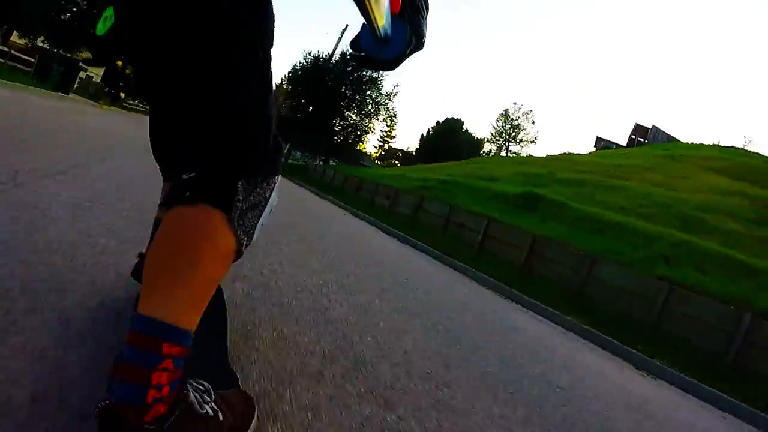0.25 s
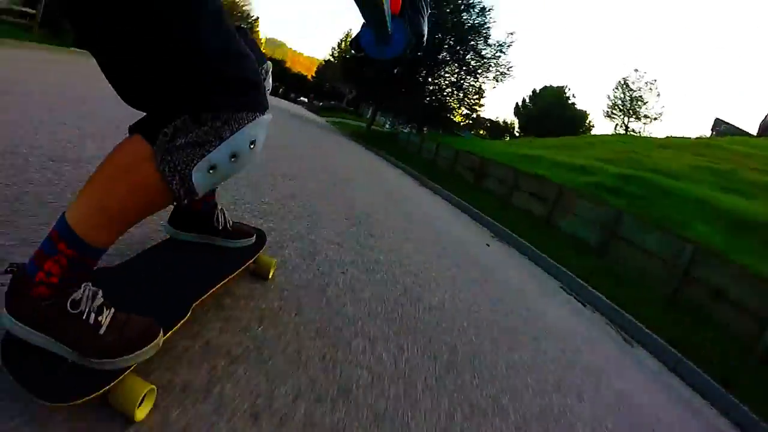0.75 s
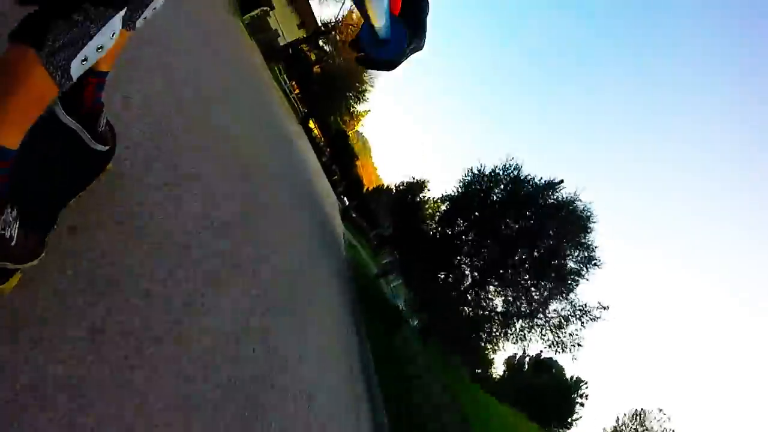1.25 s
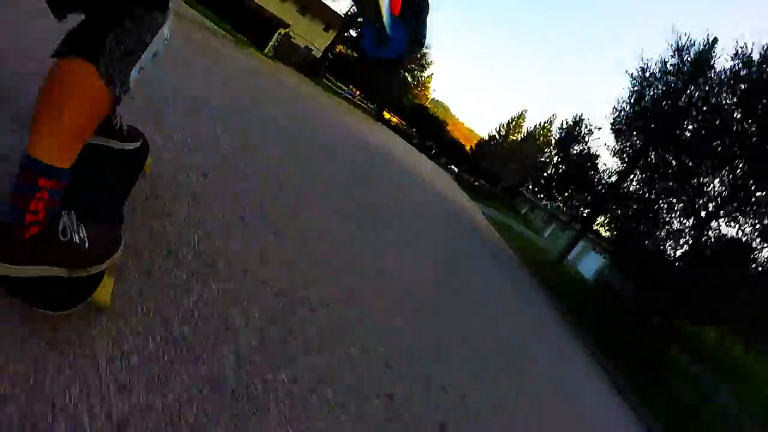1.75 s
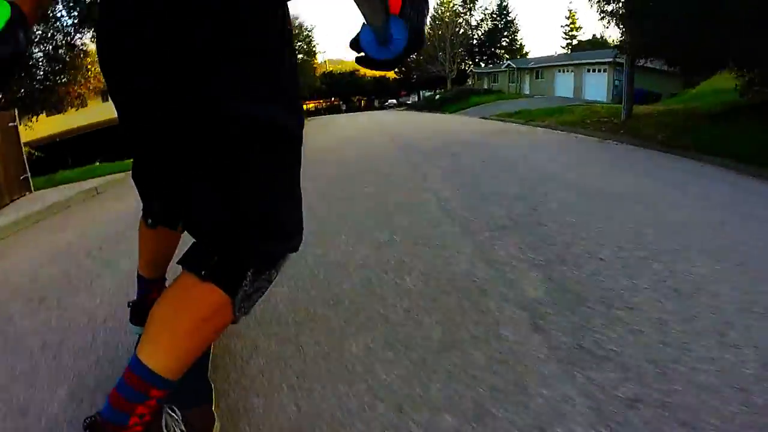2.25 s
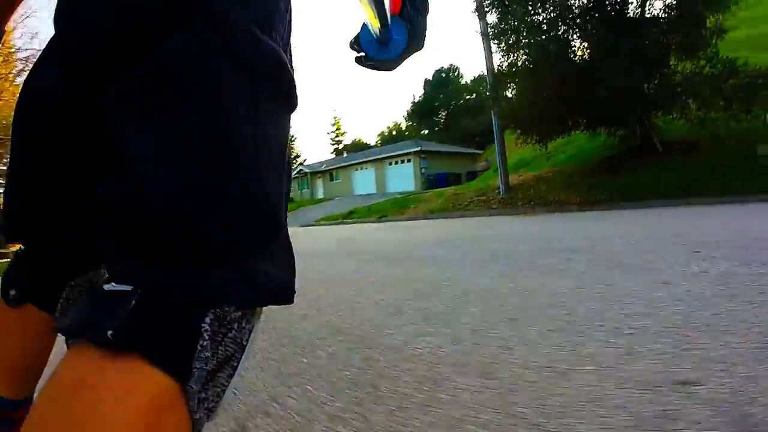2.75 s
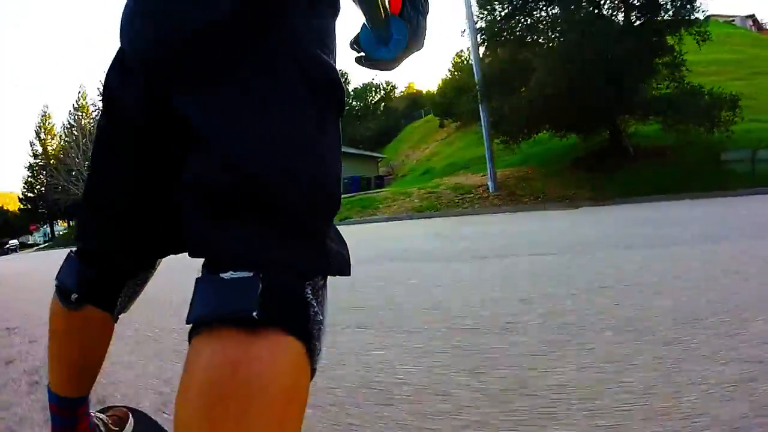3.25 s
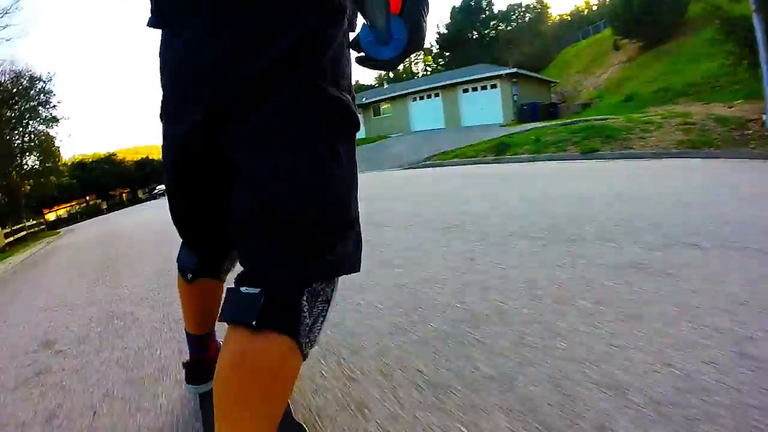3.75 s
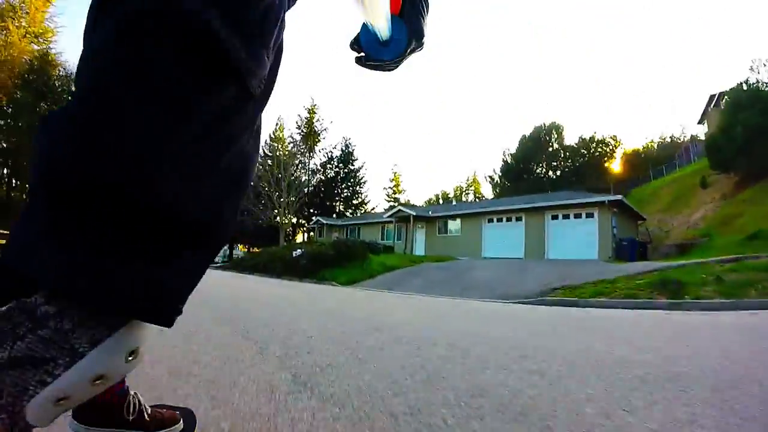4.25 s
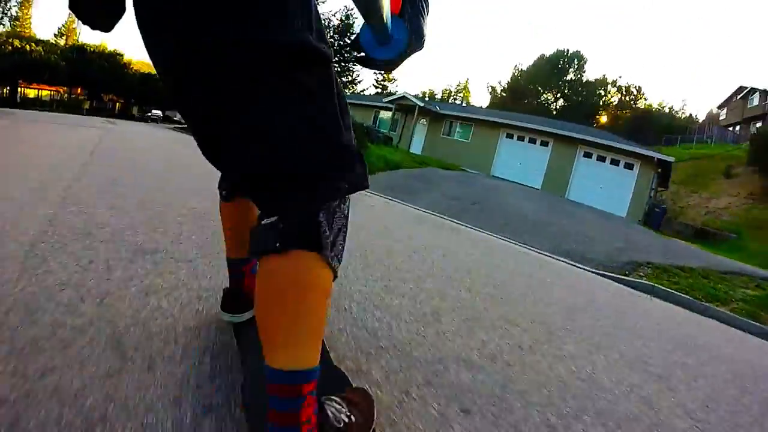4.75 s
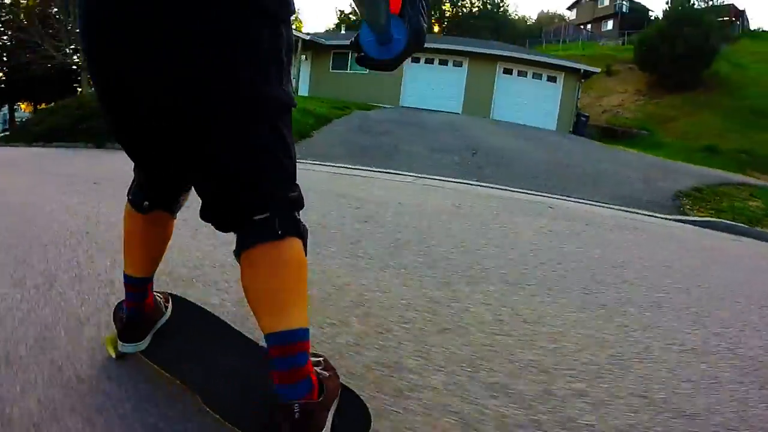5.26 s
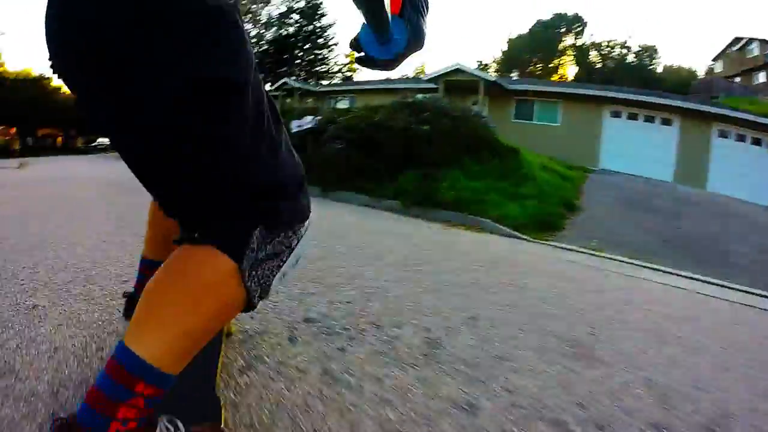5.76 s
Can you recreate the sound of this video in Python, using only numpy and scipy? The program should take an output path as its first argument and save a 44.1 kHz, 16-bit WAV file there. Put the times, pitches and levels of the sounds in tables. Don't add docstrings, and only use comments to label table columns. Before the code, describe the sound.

Heavy wind buffets a pole-mounted microphone while longboard wheels rumble and hiss over rough asphalt, with sliding scrubs and small pebble clicks.

```python
import sys
import numpy as np
from scipy import signal
from scipy.fft import rfft, irfft
from scipy.io import wavfile
from scipy.ndimage import uniform_filter1d, minimum_filter1d

SR = 44100
rng = np.random.default_rng(int(sys.argv[2]) if len(sys.argv) > 2 else 0)


def master_out(mix):
    frames = np.transpose(np.atleast_2d(mix))
    ceiling = np.clip(frames, -1, 1)
    pcm = np.round(ceiling * 32767).astype(np.int16)
    wavfile.write(sys.argv[1], SR, pcm)


def amplitude_ratio(level_db):
    exponent = np.asarray(level_db, float) / 20
    return 10 ** exponent


N = 265482

# time in seconds, level in dB.
WIND_PRESSURE = [(0, -16.5), (0.25, -22.5), (0.4, -21.5), (0.85, -17.5), (1.2, -21), (1.5, -21),
                 (1.69, -26.5), (1.85, -27), (2.36, -29), (2.45, -20.5), (3.35, -18), (3.58, -30),
                 (4.1, -22.5), (4.38, -16.5), (4.8, -25.5), (5.4, -22.5), (5.82, -28.5), (6.02, -14.5)]
# frequency in Hz, density in dB per Hz.
HEAVE_SPECTRUM = [(10, -24.5), (22, -4), (35, -5), (60, -4), (90, -10.5), (140, -12), (300, -33.5)]
FLUTTER_SPECTRUM = [(50, -11.5), (90, -2.5), (130, -6.5), (200, -4.5), (260, -8.5), (350, -10),
                    (700, -52.5)]
# peak time in seconds, peak in dB, width in ms.
SUCKS = [(0.002, 2.5, 0.87), (0.129, -12, 11), (0.157, -12, 7.6), (0.203, -9.5, 2.4), (0.252, -21.5, 5.1),
         (0.552, -12.5, 9.1), (0.652, -19, 15.5), (0.681, -15.5, 9.1), (0.745, -14, 5), (0.756, -7.5, 7.1),
         (0.792, -10, 12), (0.845, -14, 5.1), (0.871, -8.5, 2.1), (0.986, -11, 2.9), (1.118, -7, 2.6),
         (1.129, -14.5, 15), (1.169, -17, 9.8), (2.015, -11, 7.2), (2.454, -3, 12), (2.486, -9, 8.4),
         (2.522, -8, 6.2), (2.579, -7, 2.5), (2.591, -11.5, 8.5), (2.625, -12, 6.4), (2.678, -25, 4.6),
         (2.778, -13.5, 12), (2.807, -8, 3.4), (2.832, -8.5, 11), (2.939, -21, 4.8), (2.956, -11, 4.1),
         (3.03, -6.5, 4.1), (3.047, -9.5, 12), (3.082, -11.5, 11), (3.12, -14, 11), (3.154, -9.5, 9.1),
         (3.187, -16.5, 6.7), (3.266, -15, 13), (3.302, -19, 8.8), (3.375, -7.5, 8.5), (4.186, -18.5, 3.7),
         (4.248, -15, 5.6), (4.312, -8, 14), (4.377, -14.5, 5.7), (4.402, -9.5, 8.6), (4.5, -17, 3.5),
         (5.159, -11.5, 9.2), (5.214, -8, 3.8), (5.272, -1.5, 3.3), (5.336, -16.5, 5.1), (5.388, -8, 7.1),
         (5.408, -12, 6.4), (5.417, -11.5, 5.4), (5.925, -9, 5.1), (5.983, -9, 4.6), (6, -12, 4.2)]
PUSHES = [(0.07, -19, 5.6), (0.139, -24, 5.9), (0.559, -6.5, 3.9), (0.666, -17, 8.1), (0.737, -11, 5.5),
          (0.772, -15, 5.8), (0.816, -14, 4.0), (0.882, -27, 8.6), (0.901, -7, 4.4), (1.114, -6, 5.6),
          (1.159, -11, 8), (2.44, -1, 7.5), (2.462, -3.5, 5.9), (2.575, -4.5, 5.5), (2.606, -6.5, 11),
          (2.796, -21, 20.7), (2.822, -10, 7), (2.923, -14, 5.8), (2.966, -10, 13), (3.013, -13, 7.6),
          (3.034, -16, 4.7), (3.051, -13, 3.3), (3.067, -10, 5.1), (3.073, -17, 2.3), (3.105, -6.5, 2.9),
          (3.132, -10, 5.6), (3.162, -16, 7), (3.37, -11, 6.5), (3.393, -11, 5.1), (4.133, -1.5, 1.4),
          (4.276, -12, 13), (4.299, -15, 7.4), (4.322, -8, 7.6), (4.349, -12, 2.9), (4.387, -17, 9.8),
          (4.393, -8, 2), (4.428, -12, 11), (4.507, -14, 6.3), (5.268, -6, 13), (5.303, -9, 12),
          (5.342, -5.5, 2.8), (5.379, -18, 3.4), (5.397, -13, 12), (5.431, -11, 10), (5.656, -6.5, 4.5),
          (5.959, -7, 11), (5.995, -8, 15), (6.019, -6, 7.1)]
# time in seconds, peak in dB, centre
# in Hz, width in ms.
SNAPS = [
    (3.2228, -41, 11500, .1),
    (4.7255, -35, 2100, 1.6),
    (4.7675, -36, 3200, 1.5),
    (3.338, -41, 3400, 1.5),
    (3.377, -48, 5600, 1.2),
    (1.298, -33, 2400, 1.6),
    (2.094, -43, 4600, 1.5),
]
# time in seconds, peak at 4-8 kHz in dB, 8-14 kHz over it in dB, 2.5-4 kHz over it in dB.
PEBBLES = [(0.103, -48, -37, 6), (0.1505, -34.5, -26, 2), (0.8908, -44, -16, -3), (1.5918, -26, -31, -14),
           (1.8874, -57, -11.5, -3), (2.054, -40.5, -36, -2), (2.0605, -30.5, -24.5, 7),
           (2.397, -39, -28.5, -17), (3.4123, -52.5, -12.5, -11), (3.6631, -49, -13, -7),
           (3.5852, -42, -10.5, -17), (3.755, -43.5, -27, -9), (3.869, -48, -12.5, -2),
           (3.9892, -47.5, -12, -7), (4.1756, -39.5, -16.5, 0), (4.487, -33.5, -17, 7.5),
           (4.579, -31.5, -19, -4), (4.6718, -34, -27, -4), (4.6985, -35.5, -28, -4),
           (4.7505, -42, -26, -19), (4.7646, -31.5, -28.5, -6), (4.781, -33.5, -34, 5),
           (4.819, -45, -8, -6), (5.1192, -48, 1, 5), (5.2563, -41, -25, 19), (5.357, -53, -6, 0),
           (5.802, -38.5, -30, 14)]
# frequency in Hz, density in dB per Hz.
PEBBLE_BANDS = [
    [(4000, -13), (4800, -3.5), (5300, 1.5), (6200, -10), (7500, -14.5), (8500, -31)],
    [(7500, -21), (8500, 0.5), (11000, -2), (13200, -7.5), (14200, -23)],
    [(2200, -30), (2900, -7.5), (3350, -4.5), (3700, -3.5), (4100, -26.5)],
]
# peak
# time in seconds, peak in dB, ring in Hz.
CRACKS = [(0.039, -11, 365), (0.151, -16, 240), (0.22, -5.5, 379), (0.793, -15.5, 229), (0.798, -21, 320),
          (0.891, -10, 344), (0.949, -12, 254), (0.965, -17, 380), (1.094, -14, 227), (1.094, -5, 410),
          (1.15, -8, 390), (1.197, -5, 393), (1.392, -12, 358), (1.477, -13, 338), (1.603, -13, 410),
          (2.094, -17, 241), (2.302, -18, 360), (2.442, -13, 336), (2.574, -11, 237), (2.803, -15, 228),
          (2.826, -18, 226), (2.888, -14, 325), (2.956, -10.5, 369), (3.027, -8.5, 364), (3.244, -16, 400),
          (3.258, -17, 215), (3.277, -9, 356), (3.335, -3, 374), (3.603, -11.5, 346), (3.784, -11, 353),
          (4.517, -15, 216), (4.604, -19, 397), (4.637, -13, 251), (4.638, -6, 376), (4.66, -5, 394),
          (4.688, -16, 260), (4.694, -9, 339), (4.736, -15, 349), (4.775, -17, 243), (4.82, -7, 401),
          (4.856, -13, 245), (4.975, -5.5, 369), (5.117, -7.5, 349), (5.178, -6.5, 349), (5.217, -11, 196),
          (5.481, -15, 386), (5.737, -11.5, 368), (5.903, -8, 330), (5.919, -12, 230), (5.924, -16, 345),
          (5.985, -8, 323), (6.004, -18, 356),
          (0.031, -21, 517), (0.114, -10.5, 583), (0.419, -13, 568), (0.487, -23, 562), (0.561, -21, 573),
          (0.592, -19.5, 926), (0.886, -16, 510), (0.99, -16.5, 880), (0.993, -13, 538), (1.012, -8, 728),
          (1.025, -10, 513), (1.048, -11, 553), (1.081, -10.5, 695), (1.107, -9, 528), (1.116, -15, 840),
          (1.203, -14, 820), (1.31, -27, 824), (1.352, -9, 566), (1.441, -9, 517), (1.502, -10.5, 914),
          (1.661, -18, 832), (1.664, -15, 590), (2.009, -15, 553), (2.29, -14, 555), (2.33, -15.5, 586),
          (2.475, -18.5, 830), (2.542, -14.5, 560), (2.864, -14, 768), (2.992, -14, 595), (3.015, -13, 597),
          (3.019, -15, 890), (3.331, -13.5, 568), (4.073, -12, 865), (4.096, -16, 590), (4.244, -12, 590),
          (4.29, -15, 580), (4.353, -15, 596), (4.395, -16, 612), (4.552, -13, 526), (4.611, -4, 547),
          (4.75, -24, 830), (4.779, -19, 918), (4.928, -12.5, 556), (5.253, -10.5, 571), (5.453, -16, 620),
          (5.512, -13, 554), (5.633, -21, 843), (5.639, -10.5, 618), (5.688, -18, 930), (5.715, -12, 559),
          (5.782, -12, 560), (6.018, -27, 840)]
# time in seconds, load in dB, lift of the lowest modes by the rider's weight in dB,
# lift of the middle modes as the front foot eases off in dB.
ROLLING = [(0.0, -26.5, 5.5, 3), (0.08, -22, 3, -7.5), (0.59, -23, -2, -1), (0.74, -29, 6, 4.5),
           (0.93, -18.5, 1.5, -2.5), (1.52, -19.5, -1, -6), (1.86, -28.5, 0.5, -5.5), (2.38, -20, -1, -5.5),
           (2.63, -25.5, 1, -4), (2.9, -21, 1, -3), (3.17, -26.5, 4.5, 3), (3.84, -25.5, 2.5, -3),
           (3.92, -23, -2.5, -3.5), (4.71, -24, 7, 2.5), (4.76, -18.5, 0.5, -4.5), (5.01, -26, 5, 1),
           (5.85, -23, 3, -5.5), (6.02, -20, 2, -5)]
# frequency in Hz, width in Hz, level in dB.
DECK_LOW = [(330, 108.6, 0.5), (379.4, 87.3, 2), (422, 69.7, 0.5), (444.3, 28, -17), (268, 87, -6)]
DECK_MIDDLE = [(477, 63, -3), (540.7, 66, 4), (610.5, 95, 4.5)]
DECK_UPPER = [(672.4, 108, 0), (887.5, 186, 2), (1080, 182, -0.5), (1251, 150, -14.5)]
# time in seconds, hiss from side force in dB, lower and upper tread resonance in Hz,
# rattle of the lower shell modes in dB, lift of the top by dry grit in dB, shell-to-tread gap in Hz.
TYRE_HISS = [(0.0, -41, 5100, 5900, -3, -2.5, 4400), (0.2, -40.5, 5100, 6080, 4, 1.5, 4350),
             (0.42, -43, 5100, 5950, 2.5, 2, 4300), (0.72, -42, 5320, 6080, 1.5, -4.5, 4300),
             (1.0, -41, 5700, 5940, 8, 1.5, 4400), (1.25, -39, 5080, 6980, 5, 2.5, 4600),
             (1.73, -38.5, 5250, 6320, 0.5, -0.5, 4500), (1.8, -53, 5180, 6320, 0, 3, 4400),
             (2.03, -47, 5220, 5900, 3, 1, 4300), (2.41, -39, 5250, 5980, -1.5, 0, 4450),
             (2.68, -49.5, 4700, 6250, -0.5, -0.5, 4100), (2.81, -44.5, 4580, 6230, -0.5, 0, 4000),
             (3.42, -46, 4970, 5900, -4, -1, 4550), (3.84, -45, 5080, 6320, 0, 2, 4350),
             (4.29, -37.5, 4820, 5650, -8, -2.5, 4300), (4.95, -40, 5230, 5850, 3, 1, 4600),
             (5.84, -44, 4970, 6140, -1, 1.5, 4500), (5.97, -40.5, 5400, 6110, 2, 1, 4500)]
# start, return of grip and release length in seconds, extra scrub in dB,
# outer over inner tread in dB.
SLIDES = [
    (0.056, 0.207, .1, 4, 3),
    (0.475, 0.63, 0.086, 7, -7.5),
    (0.73, 1.74, 0.11, 11, -2.5),
    (2.15, 2.486, 0.12, 4.5, -2),
    (2.5, 3.043, 0.069, 7, -4),
    (3.214, 3.44, 0.14, 8.5, -1),
    (3.946, 4.341, 0.15, 4.5, -0.5),
    (4.708, 5.153, 0.17, 2.5, 10),
    (5.502, 5.749, 0.076, 4.5, -5),
]
# frequency in Hz, density in dB per Hz.
SHELL_SPECTRUM = [(790, -29.5), (1350, 0.5), (1460, -6), (1570, -7), (1750, -15), (2010, -6.5),
                  (2180, -13.5), (2470, -14.5), (3340, -5.5), (3500, -9.5), (3870, -19), (4700, -21),
                  (6500, -33.5), (8300, -60)]
TREAD_SPECTRUM = [(3800, -21), (4400, -0.5), (7400, 6), (7900, 6.5), (10000, -46.5)]
SCRUB_SPECTRUM = [(7300, -20.5), (8100, 4.5), (9200, -7), (10300, -3), (11500, -8.5), (12500, -8.5),
                  (13200, -10.5), (14000, -29), (15000, -61)]
FIZZ_SPECTRUM = [(7300, -29), (8100, 1.5), (9000, 5), (9800, -1), (10800, -6), (12500, -14), (13200, -17.5),
                 (13900, -37), (15000, -60.5)]
CHATTER_SPECTRUM = [(1200, -18.5), (1500, -4), (2500, -1.5), (4300, -8), (4700, -16), (5200, -30.5)]
# frequency in Hz, width in Hz, level in dB.
SHELL_NOTCHES = [(8160, 430, -4.5)]


def evened(x):
    return x / np.sqrt(np.mean(x ** 2) + 1e-20)


def columns(rows):
    time_s, *values = np.transpose(rows)
    return [np.interp(np.arange(N) / SR, time_s, v) for v in values]


def coloured(x, points):
    point_hz, point_db = np.transpose(points)
    hz = np.fft.rfftfreq(len(x), 1 / SR)
    gain_db = np.interp(np.log(hz + 1), np.log(point_hz + 1), point_db, left=-90, right=-90)
    return evened(irfft(rfft(x) * amplitude_ratio(gain_db), len(x)))


def resonate(x, hz, width_hz):
    turn = np.exp(2j * np.pi * np.cumsum(hz * np.ones(len(x))) / SR)
    r = np.exp(-np.pi * width_hz / SR)
    return 2 * (turn * signal.lfilter([1 - r], [1, -r], x / turn)).real


def mode(x, hz, width_hz):
    r = np.exp(-np.pi * width_hz / SR)
    section = [1, 0, -1, 1, -2 * r * np.cos(2 * np.pi * hz / SR), r * r]
    return evened(signal.sosfilt([section, section], x))


def flicker(depth_db, slow_hz, fast_hz):
    wander = coloured(rng.standard_normal(N), [(slow_hz, 0), (fast_hz, -6), (2 * fast_hz, -30)])
    return evened(amplitude_ratio(depth_db * wander))


def patchy(x, depth_db):
    z = signal.stft(x, nperseg=256)[2]
    field = uniform_filter1d(rng.standard_normal(z.shape), size=4, axis=0)
    field = uniform_filter1d(field, size=30, axis=1)
    return evened(signal.istft(z * amplitude_ratio(depth_db * evened(field)), nperseg=256)[1][:N])


def grit(per_s, spread_db, smooth):
    size = amplitude_ratio(spread_db * np.minimum(rng.exponential(1, N), 3.3)) * rng.choice([-1., 1.], N)
    knocks = size * (rng.random(N) < per_s / SR)
    return evened(evened(knocks) + smooth * rng.standard_normal(N))


def eddies():
    level_db, rebound, rebound_widths = -0.5, 0.66, 1.9
    out = np.zeros(N + SR)
    for sign, rows in ((-1.0, SUCKS), (0.96, PUSHES)):
        for s, db, width_ms in rows:
            u = np.arange(-3000, 3000) / SR / (width_ms / 2350)
            swing = np.exp(-u ** 2 / 2)
            swing -= rebound / rebound_widths * np.exp(-(u / rebound_widths) ** 2 / 2)
            out[round(s * SR):][:6000] += sign * amplitude_ratio(db + level_db) * swing / swing.max()
    return out[3000:][:N]


def wind():
    heave_db, flutter_db, flutter_follows = -2, -25.5, 0.55
    wake_db, wake_s = -32.5, 0.033
    pressure_db, = columns(WIND_PRESSURE)
    starts = np.zeros(N)
    starts[[round(s * SR) for s, _, _ in SUCKS]] = [amplitude_ratio(db + wake_db) for _, db, _ in SUCKS]
    age = np.arange(SR // 2) / SR / wake_s
    wake = abs(signal.oaconvolve(starts, np.e * age * np.exp(-age))[:N])
    pressure = amplitude_ratio(pressure_db) + wake
    lumps = flicker(depth_db=3.5, slow_hz=7.9, fast_hz=14)
    heave = coloured(rng.standard_normal(N), HEAVE_SPECTRUM) * lumps
    flutter = coloured(rng.standard_normal(N), FLUTTER_SPECTRUM) * lumps ** 0.28
    heave *= amplitude_ratio(heave_db) * pressure
    flutter *= amplitude_ratio(flutter_db) * evened(pressure ** flutter_follows)
    return heave + flutter + eddies()


def snaps():
    out, t = np.zeros(N), np.arange(-300, 300) / SR
    for s, db, hz, width_ms in SNAPS:
        burst = np.exp(-(2000 * t / width_ms) ** 2) * np.cos(2 * np.pi * hz * t)
        out[round(s * SR) - 300:][:600] += amplitude_ratio(db) * burst
    return out


def pebbles():
    lead_s, rise_s, fall_60db_s = .001, 0.0022, 0.015
    out, t = np.zeros(N), np.arange(600) / SR
    for s, db, high_db, low_db in PEBBLES:
        crack = rng.standard_normal(600) * np.clip((t - lead_s) / rise_s, 0, 1) * amplitude_ratio(-60 * t / fall_60db_s)
        bands = [coloured(crack, band) for band in PEBBLE_BANDS]
        middle, high, low = (b / abs(b).max() for b in bands)
        flick = middle + amplitude_ratio(high_db + 3.5) * high + amplitude_ratio(low_db - 8.0) * low
        out[round((s - lead_s) * SR):][:600] += amplitude_ratio(db) * flick
    return out


def cracks():
    level_db, rise_s, fall_s = -4.5, .008, .013
    out, t = np.zeros(N + SR), np.arange(-2000, 2000) / SR
    swell = np.exp(-(t / np.where(t < 0, rise_s, fall_s)) ** 2 / 2)
    for s, db, hz in CRACKS:
        out[round(s * SR):][:4000] += amplitude_ratio(db + level_db) * swell * np.sin(2 * np.pi * hz * t)
    return out[2000:][:N]


def damped(x):
    damping = .2
    power = abs(uniform_filter1d(x ** 2, size=500))
    return evened(x / (power + 0.055) ** (damping / 2))


def deck_ring(shake, modes):
    ring = np.zeros(N)
    for k, (hz, width_hz, db) in enumerate(modes):
        ring += (-1) ** k * amplitude_ratio(db) * mode(shake, hz, 1.41 * width_hz)
    return damped(evened(ring))


def deck():
    load_db, low_db, middle_db = columns(ROLLING)
    shake = grit(per_s=1800, spread_db=2.5, smooth=1.06)
    shake *= flicker(depth_db=1.17, slow_hz=7.1, fast_hz=40)
    upper = deck_ring(shake, DECK_UPPER)
    middle = amplitude_ratio(middle_db) * deck_ring(shake, DECK_MIDDLE)
    low = amplitude_ratio(low_db + 0.55) * deck_ring(shake, DECK_LOW)
    return amplitude_ratio(load_db) * (upper + middle + low)


def slides():
    build_share = 0.32
    t = np.arange(N) / SR
    slide_db, edge_db = np.zeros(N), np.zeros(N)
    for start_s, grip_s, release_s, extra_db, bite_db in SLIDES:
        built_s = start_s + build_share * (grip_s - start_s)
        shape = np.interp(t, [start_s, built_s, grip_s, grip_s + release_s], [0, 1, 1, 0])
        slide_db += extra_db * shape
        edge_db += bite_db * shape
    return slide_db, edge_db


def twin(stones):
    return stones * rng.choice([-1., 1.], N)


def tyres():
    tread_low_db, tread_high_db, tread_follows = -17.5, -17, 0.68
    scrub_mean_db, scrub_follows, full_slide_db = -69.5, 0.96, 1.5
    hiss_db, low_hz, high_hz, rattle_db, dry_db, _ = columns(TYRE_HISS)
    slide_db, edge_db = slides()
    scrub_db = scrub_mean_db + scrub_follows * (hiss_db - hiss_db.mean()) + slide_db
    low_db = tread_low_db + tread_follows * slide_db - edge_db / 2
    high_db = tread_high_db + tread_follows * slide_db + edge_db / 2

    stones = grit(per_s=2500, spread_db=3.5, smooth=0.91)
    stones *= flicker(depth_db=0.64, slow_hz=8.7, fast_hz=60)
    rasp = patchy(stones, depth_db=0.5)
    low = coloured(patchy(twin(stones), depth_db=2.3), TREAD_SPECTRUM)
    low = evened(resonate(resonate(low, low_hz, 770), low_hz, 770))
    high = coloured(patchy(twin(stones), depth_db=2.5), TREAD_SPECTRUM)
    high = evened(resonate(resonate(high, high_hz, 1300), high_hz, 1800))
    shell = coloured(rasp, SHELL_SPECTRUM)
    lower_shell = signal.sosfiltfilt(signal.butter(4, 2500, fs=SR, output="sos"), shell)
    rolling = shell + (amplitude_ratio(rattle_db) - 1) * lower_shell + amplitude_ratio(low_db) * low + amplitude_ratio(high_db) * high

    sliding = np.clip((slide_db - full_slide_db) / 8.4, 0, 1)
    scrub = coloured(rasp, SCRUB_SPECTRUM)
    fizz = coloured(patchy(twin(stones), depth_db=-0.5), FIZZ_SPECTRUM)
    fizz *= flicker(depth_db=1.5, slow_hz=6, fast_hz=20)
    top = sliding * scrub + (1 - sliding) * fizz
    chatter = amplitude_ratio(11.5) * sliding ** 0.83 * coloured(twin(stones), CHATTER_SPECTRUM)
    return amplitude_ratio(hiss_db) * rolling + amplitude_ratio(scrub_db) * (amplitude_ratio(dry_db) * top + chatter)


def notched(x):
    gap_share, gap_width_hz = .55, 300
    gap_hz = columns(TYRE_HISS)[-1]
    x = x - gap_share * resonate(x, gap_hz, gap_width_hz)
    hz = np.fft.rfftfreq(N, 1 / SR)
    gain_db = sum(db * np.exp(-((hz - centre_hz) / width_hz) ** 2) for centre_hz, width_hz, db in SHELL_NOTCHES)
    return irfft(rfft(x) * amplitude_ratio(gain_db), N)


def scene():
    return (wind() + snaps() + pebbles() + cracks() + deck() + notched(tyres()))[None]


def roll_off(x):
    return signal.sosfilt(signal.butter(12, 14960, fs=SR, output="sos"), x)


def record(dry):
    ceiling, strength = .82, .9
    dry = dry * np.minimum(np.arange(N) / 200, 1)
    peak = -minimum_filter1d(-abs(dry), size=300, axis=1)
    level = uniform_filter1d(peak, size=300, axis=1)
    reduction = np.maximum(level / ceiling, 1) ** strength
    held = dry / uniform_filter1d(reduction, size=120, axis=1)
    return roll_off(held)


dry = scene()
out = record(dry)
master_out(out)
```